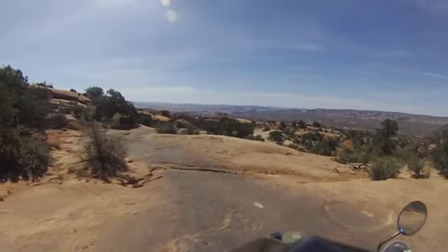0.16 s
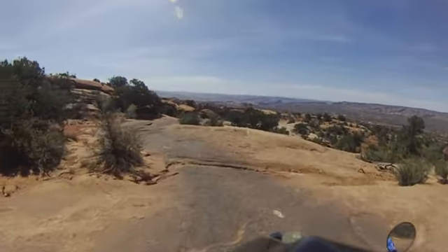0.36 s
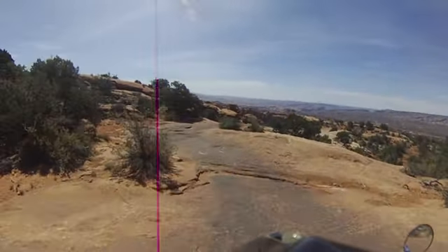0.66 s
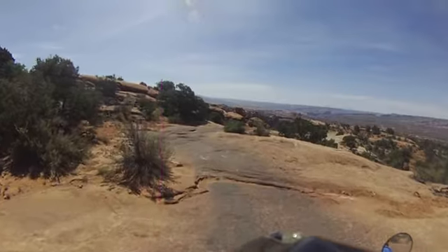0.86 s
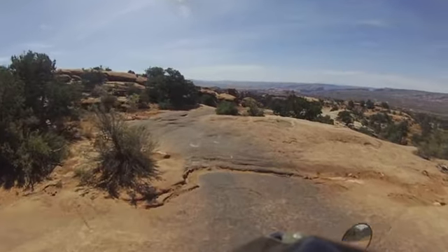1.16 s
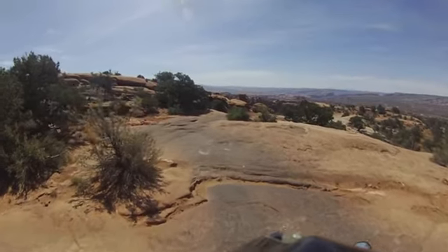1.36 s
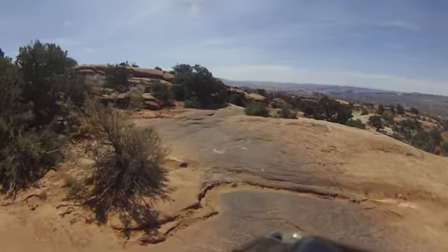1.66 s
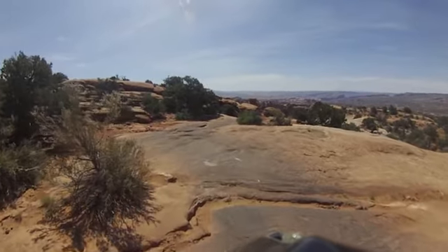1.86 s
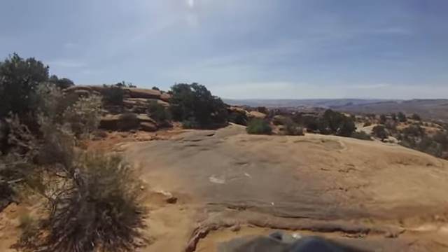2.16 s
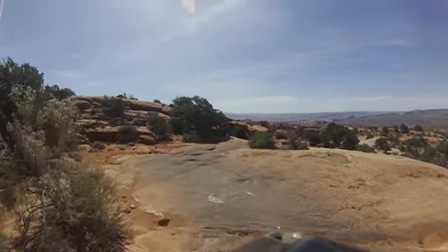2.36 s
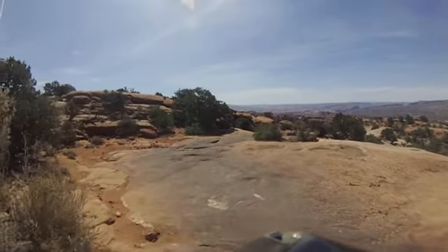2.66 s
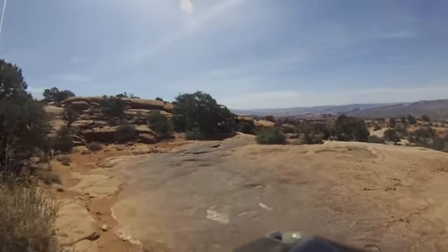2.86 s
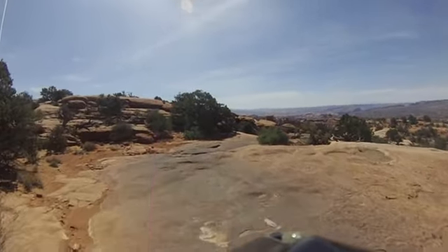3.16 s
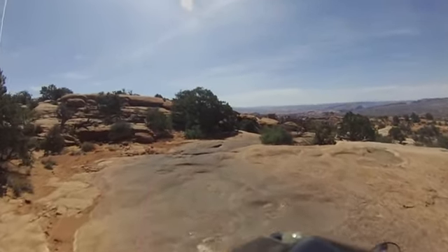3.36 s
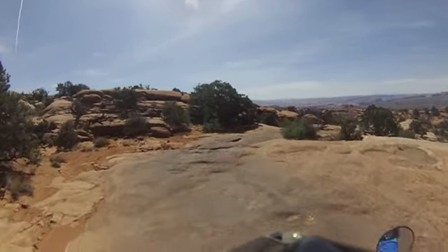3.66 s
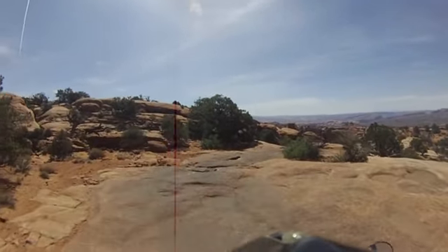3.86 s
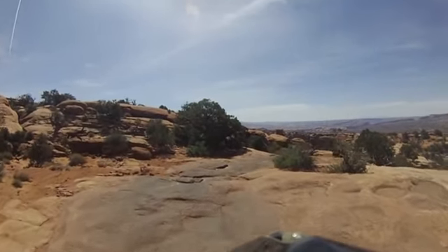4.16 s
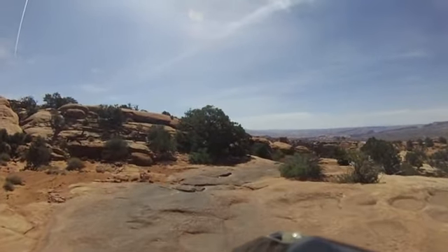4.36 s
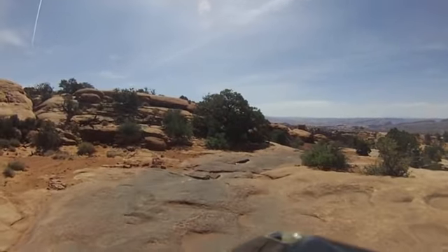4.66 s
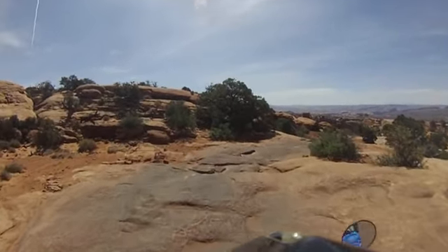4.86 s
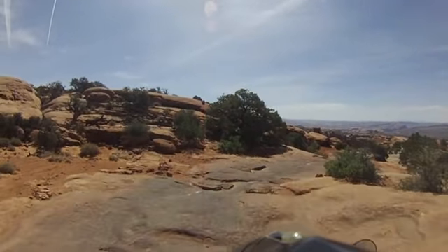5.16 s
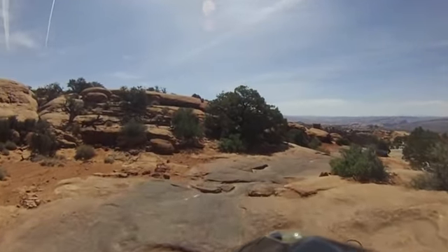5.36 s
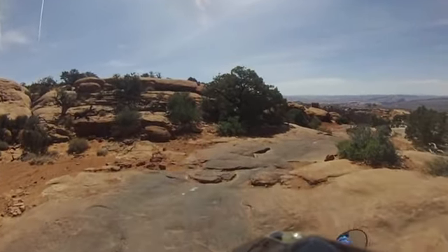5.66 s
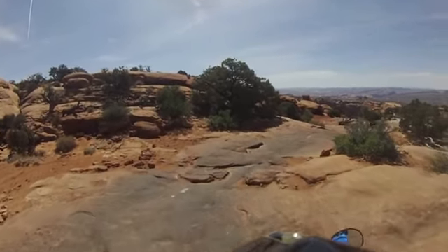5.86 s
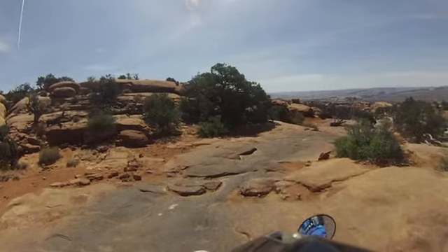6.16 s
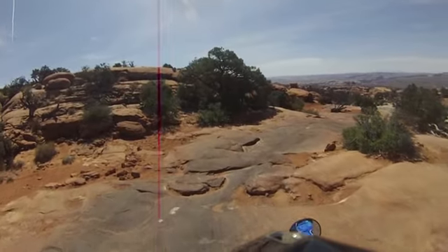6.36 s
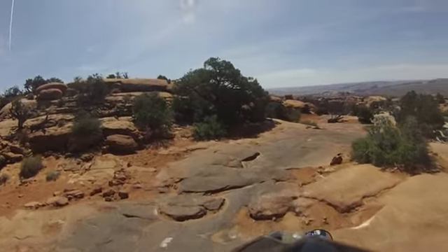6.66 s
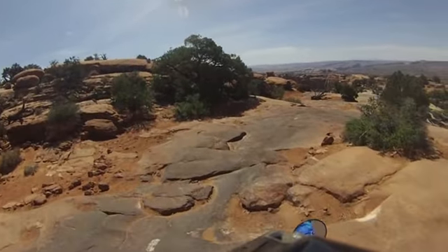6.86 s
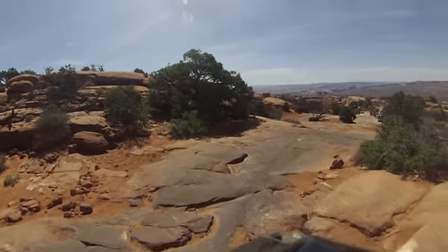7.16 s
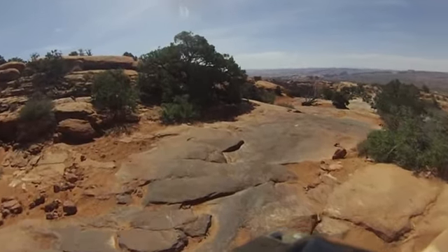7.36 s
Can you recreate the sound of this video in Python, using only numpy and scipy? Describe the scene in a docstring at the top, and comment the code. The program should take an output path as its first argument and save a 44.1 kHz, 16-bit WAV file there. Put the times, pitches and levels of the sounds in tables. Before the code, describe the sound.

Heard from the seat, a quad bike putters slowly over rock, its throttle rising and dropping while tyres scrub and loose parts knock.

```python
"""A quad bike on desert rock

A single-cylinder quad bike crawls over bare rock, heard from the rider's place.
Each firing is a separate chug in the muffler, hard on the throttle and soft when it coasts.
The timing chain sizzles, the tyres rumble and scrub, and loose parts knock on the bumps."""
import sys
import numpy as np
from scipy import signal
from scipy.fft import rfft, irfft, next_fast_len
from scipy.io import wavfile

SR = 44100
rng = np.random.default_rng(int(sys.argv[2]) if len(sys.argv) > 2 else 0)


def master(y):
    """Save y as 16-bit WAV."""
    cut = np.clip(np.atleast_2d(y).T, -1, 1)
    pcm = np.round(cut * 32767)  # scale
    wavfile.write(sys.argv[1], SR, pcm.astype(np.int16))


N = 331191
TIME = np.arange(N) / SR


def amp(db):
    """Turns decibels into a number to multiply a sound by."""
    return 10 ** (np.asarray(db) / 20)


def unit(x):
    """Scales a signal so that its average (rms) level is 1."""
    return x / np.sqrt(np.mean(x ** 2) + 1e-20)


def curve(rows):
    """Joins rows of time and value with straight lines, giving one value per sample."""
    return np.interp(TIME, *np.transpose(rows))


def add(mix, start, sound):
    """Lays a sound into the mix at a start time in seconds."""
    part = mix[max(round(start * SR), 0):][:len(sound)]
    part += sound[:len(part)]


def noise(tone):
    """Noise of level 1, shaped by rows of frequency in Hz and relative level in dB."""
    size = next_fast_len(N)
    hz, db = np.transpose(tone)
    colour = amp(np.interp(np.log(np.fft.rfftfreq(size, 1 / SR) + 1), np.log(hz), db))
    return unit(irfft(rfft(rng.standard_normal(size)) * colour, size)[:N])


def resonate(x, hz, width_hz):
    """Keeps a band of the sound around hz, which may be steady or gliding."""
    turn = np.exp(2j * np.pi * np.cumsum(hz * np.ones(len(x))) / SR)
    decay = np.exp(-np.pi * width_hz / SR)
    return 2 * (turn * signal.lfilter([1 - decay], [1, -decay], x / turn)).real


def wander(rate_hz):
    """A slow random wobble of level 1."""
    knots = np.arange(0, N / SR + 1, 1 / rate_hz)
    return unit(np.interp(TIME, knots, rng.standard_normal(len(knots))))


def cavity(resonances, s):
    """How a hollow space rings at each frequency; s is the frequency in Hz times 1j."""
    return sum(gain * hz * width / (s * s + width * s + hz * hz) for hz, width, gain in resonances)


def tyre_rumble(level_db=-5.5, lumpy_db=0.04):
    """Soft tyres and the frame rumble over the rock."""
    # The rumble's tone. Each row: frequency in Hz, relative level in dB.
    rumble_tone = [(20, -26), (45, -21), (75, -6), (110, -8), (160, 1), (250, -7.5), (330, -9),
                   (440, -10.5), (560, -18.5), (900, -19), (2000, -80)]
    # How the rumble rises and falls. Each row: time in seconds, relative level in dB.
    rolling = [(0.1, -35), (0.55, -37.5), (0.81, -38.5), (3.11, -30.5), (3.76, -36), (4.23, -33.5),
               (4.38, -31.5), (4.66, -36.5), (5.07, -40), (5.54, -39.5), (6.38, -35.5), (6.91, -37.5),
               (7.45, -40.5)]
    return amp(curve(rolling) + level_db + lumpy_db * wander(rate_hz=8.3)) * noise(rumble_tone)


def tyre_scrub(level_db=-3, grip_db=-59.5, hoarse_db=-3.5):
    """Tread blocks stick and slip on the rock: a gliding moan in hoarse noise, swelling at each slip."""
    # Each row is one slip: middle in seconds, length in seconds, pitch in Hz, relative level in dB.
    slips = [(0.19, 0.36, 730, -46), (1.05, 0.29, 910, -47), (1.3, 0.18, 890, -45),
             (1.817, 0.53, 928, -45.5), (2.38, 0.19, 935, -43), (3.21, 0.13, 894, -44),
             (4.01, 0.45, 950, -51), (4.404, 0.21, 870, -45.5), (4.755, 0.18, 747, -44),
             (5.167, 0.35, 734, -42.5), (5.453, 0.37, 798, -41.5), (5.733, 0.23, 894, -48),
             (6.1, 0.43, 840, -49), (6.637, 0.13, 755, -44), (6.97, 0.11, 782, -44), (7.13, 0.12, 940, -53)]
    middles, _, pitches, _ = np.transpose(slips)
    moan_hz = np.interp(TIME, middles, pitches)
    power = amp(grip_db) ** 2  # tyres that hold still scrub faintly
    for middle, length, _, db in slips:
        power += (amp(db) * np.exp(-(2 * (TIME - middle) / length) ** 2)) ** 2
    moan, tread = rng.standard_normal((2, N))
    for _ in range(3):
        moan = resonate(moan, moan_hz, width_hz=135)
        tread = resonate(tread, hz=740, width_hz=420)
    return amp(level_db) * np.sqrt(power) * (unit(moan) + amp(hoarse_db) * unit(tread))


def grit_tick(start_s=3.0155, level_db=-38, fall_s=0.0007):
    """One sharp tick, like grit flicked against the frame."""
    t, out = np.arange(SR // 100) / SR, np.zeros(N)
    add(out, start_s, amp(level_db) * np.exp(-t / fall_s) * rng.standard_normal(len(t)))
    return out


def loose_parts(level_db=-5):
    """Racks and plastic panels rattle briefly on the bumps; small parts ring over a wider band. One short crack
    at 3.935 s belongs to the exhaust's bark rather than to a rattle."""
    # Each row: start in seconds, relative level in dB, pitch in Hz, seconds to fade by 60 dB. The row at 3.935
    # s is a crack in the exhaust's bark; the others are rattles.
    knocks = [(0.653, -42, 1200, 0.044), (0.938, -42, 2600, 0.026), (.957, -48, 2630, 0.066),
              (1.243, -42, 1670, 0.024), (1.37, -41, 1210, 0.067), (2.297, -46, 2400, 0.037),
              (2.557, -27, 447, 0.25), (2.564, -38, 1190, 0.062), (2.578, -42, 1200, 0.075),
              (3.181, -35, 1200, 0.013), (3.935, -34.5, 1420, 0.019), (4.361, -44.5, 2270, 0.072),
              (4.45, -36.5, 1390, 0.018), (6.609, -39, 1300, 0.12), (6.932, -42.5, 1260, 0.23),
              (6.968, -39.5, 1270, 0.012), (7.091, -38, 1280, 0.014)]
    t, out = np.arange(SR // 6) / SR, np.zeros(N)
    for start, db, hz, fade_s in knocks:
        width_hz = 400 + .15 * hz
        rattle = amp(-60 * t / fade_s) * rng.standard_normal(len(t))
        ring = resonate(resonate(rattle, hz, width_hz), hz, width_hz)
        add(out, start, amp(db + level_db) * 2 * ring / abs(ring).max())
    return out


def casing_and_chain(chugs, casing_db=10, chain_db=2.5, casing_throb=0.025, chain_throb=0.12):
    """The engine casing churns and the timing chain sizzles, both swelling once a cycle."""
    # The tone of each part. Each row: frequency in Hz, relative level in dB.
    casing_tone = [(250, 6), (500, 4.5), (700, 5), (950, -8), (1120, -4.5), (1500, -6), (2000, -17.5),
                   (3000, -21.5), (4500, -34), (9000, -49)]
    chain_tone = [(1200, -20), (2200, -2), (3300, 8), (4600, 6.5), (5100, 12), (5400, 8.5), (5650, 10.5),
                  (5900, 9.5), (6100, 6.5), (6500, 4.5), (8000, -0.5), (15000, -3)]
    # How each part rises and falls. Each row: time in seconds, relative level in dB.
    casing_levels = [(0.1, -56.5), (0.57, -57.5), (0.94, -61.5), (1.45, -54), (2.13, -59), (2.53, -54),
                     (2.74, -56.5), (3.31, -54.5), (3.5, -56.5), (3.78, -55.5), (5.52, -62.5),
                     (5.95, -57.5), (7.45, -59)]
    chain_levels = [(0.1, -64.5), (0.86, -69), (1.49, -64.5), (2.88, -65.5), (3.03, -61.5), (3.38, -65),
                    (3.46, -61.5), (3.6, -70.5), (3.66, -65.5), (5.05, -67), (5.65, -65), (5.77, -63),
                    (7.45, -65)]
    cycles = np.interp(TIME, chugs[:, 0], np.arange(len(chugs)))
    swell = np.cos(2 * np.pi * (cycles - 0.2))  # peaks a fifth of a cycle after each chug
    restless_db = 0.8 * wander(rate_hz=15)
    churn = amp(curve(casing_levels) + casing_db + restless_db) * (1 + casing_throb * swell)
    sizzle = amp(curve(chain_levels) + chain_db + restless_db) * (1 + chain_throb * swell)
    return churn * noise(casing_tone) + sizzle * noise(chain_tone)


def valve_rasp(chugs, level_db=-27.5, delay_s=0.0013, rise_s=0.00026, fall_s=0.0044, echo_s=0.00927):
    """Gas tears past the valve at the front of each hard chug and echoes once along the pipe."""
    # The tone of the rushing gas. Each row: frequency in Hz, relative level in dB.
    rasp_tone = [(250, -18), (450, 19), (650, -3), (900, 3), (1120, -2.5), (1400, 1), (1700, -3.5),
                 (2000, -18.5), (2700, -18), (4000, -28.5), (8000, -44)]
    t, bursts = np.arange(SR // 10) / SR, np.zeros(N)
    burst = (1 - np.exp(-t / rise_s)) ** 2 * np.exp(-t / fall_s)
    for start, db in chugs:
        rasp_db = 4.36 * db  # soft chugs have almost no rasp
        add(bursts, start + delay_s, amp(rasp_db) * burst)
        add(bursts, start + delay_s + echo_s, amp(rasp_db - 4) * burst)
    return amp(level_db) * bursts * noise(rasp_tone)


def firings(idle_db=-3.5, misfire_db=-13, misfire_above_hz=17.3, stumble_s=0.14, build_s=0.037):
    """Start in seconds and strength in dB of each engine cycle: hard on the throttle, soft off it."""
    # Engine speed. Each row: time in seconds, cycles per second.
    speeds = [(0.0, 13.49), (0.27, 14.34), (0.51, 23.01), (0.88, 15.61), (1.17, 20.92), (1.29, 16.32),
              (1.49, 21.55), (2.14, 21.76), (2.28, 20.09), (3.47, 24.92), (3.58, 14.07), (3.74, 20.45),
              (3.82, 16.28), (4.5, 19.55), (4.87, 12.61), (4.99, 14.27), (5.65, 16.71), (5.83, 19.34),
              (6.03, 15.94), (6.46, 17.42), (6.58, 13.26), (7.51, 11.99)]
    # Pulls on the throttle. Each row: opens and shuts in seconds, full strength of the burns in dB.
    pulls = [(0.237, 0.64, -1.5), (0.614, 0.79, -3), (0.897, 1.07, -3), (1.06, 1.24, -1.5),
             (1.989, 2.10, -1.8), (2.879, 3.08, -0.7), (3.347, 3.45, -0.1), (3.569, 4.29, -1.04),
             (4.935, 5.28, -2.5), (5.274, 5.64, -4), (5.656, 6.0, -1), (5.966, 6.17, -1),
             (6.14, 6.47, -1.38)]
    # Pops of unburnt fuel and one misfire at idle. Each row: time in seconds, strength in dB.
    odd_cycles = [(1.38, -2.5), (1.48, -2.5), (1.67, -3.5), (1.94, -3), (2.22, -2), (2.32, -0.5),
                  (2.42, -2.5), (2.70, -4.5), (2.79, -3.5), (3.14, -1), (3.18, -3.5), (3.23, -3.5),
                  (3.51, -1), (5.19, -14)]
    rate_hz = curve(speeds)
    cycle_count = np.floor(np.cumsum(rate_hz) / SR + .5)
    start_samples = np.flatnonzero(np.diff(cycle_count))
    starts = start_samples / SR
    chance = rng.standard_normal(len(starts))
    uneven_db = 0.5 * chance
    # Off the throttle it putts steadily, but runs short of fuel at speed or just after a pull.
    starved = rate_hz[start_samples] > misfire_above_hz
    for _, shuts, _ in pulls:
        starved |= (starts > shuts) & (starts < shuts + stumble_s)
    starved_db = np.minimum(misfire_db + 5.5 * chance, idle_db)
    db = np.where(starved, starved_db, idle_db + uneven_db)
    for opens, shuts, full_db in pulls:
        held = (starts > opens) & (starts < shuts)
        opening = 1 - np.exp(-(starts[held] - opens) / build_s)
        db[held] = idle_db + (full_db - idle_db) * opening + uneven_db[held]
    for when, odd_db in odd_cycles:
        db[np.argmin(abs(starts - when))] = odd_db
    return np.transpose([starts, db])


def engine(chugs, level_db=23, edge_hz=246, draw_hz=69, gulp_db=1.0, base_period_s=0.059):
    """Each cycle sends a puff of swirling gas through the muffler, then gulps air through the airbox."""
    # How the muffler, exhaust pipe and airbox ring. Each row: base pitch in Hz, width in Hz,
    # relative gain at the opening (a minus sign flips the wave).
    muffler = [(56.3, 14, 0.51), (224.4, 57.4, -5), (278.7, 55.6, 5.5), (415, 63, 4), (482.7, 59, -2),
               (1380, 290, 0.65), (2340, 360, 0.29)]
    pipe = [(148.1, 24.3, -4)]
    airbox = [(69, 40, 0.21), (154, 36.4, -0.53), (217.4, 44, 0.4)]
    # How much the pipe booms. Each row: time in seconds, relative level in dB.
    boom_levels = [(0, -1.5), (.35, 2), (.75, 0), (2.1, -0.5), (2.75, 4.5), (3.3, -4), (4.1, -2), (4.3, 4),
                   (4.7, -4), (6.15, -3.5), (6.45, 3.5), (6.65, -1), (7.51, 1)]
    size = 8192
    s = 1j * np.fft.rfftfreq(size, 1 / SR)
    t, out = np.arange(size) / SR, np.zeros(N)
    starts, strengths_db = np.transpose(chugs)
    booms = amp(np.interp(starts, *np.transpose(boom_levels)))
    for start, strength, period, boom in zip(starts, amp(strengths_db), np.gradient(starts), booms):
        speed = base_period_s / period
        # A stronger burn and a faster valve give a sharper puff.
        puff_hz = edge_hz * strength ** 0.93 * speed ** 0.12
        puff = strength / (1 + s / puff_hz) ** 2
        # The falling piston draws gas back, fired or not.
        suction = 0.51 * speed / (1 + s / (draw_hz * speed)) ** 2
        eddies = .007 * rng.standard_normal(size) * np.exp(-t / .012)
        swirl = rfft(eddies) / (1 + s / edge_hz)
        # Faster running heats the gas, so the exhaust rings higher.
        hot_s = s / speed ** 0.093
        exhaust = (puff - suction + swirl) * (cavity(muffler, hot_s) + boom * cavity(pipe, hot_s))
        # The intake opens about a quarter cycle later, and gulps harder with speed.
        delay = np.exp(-2 * np.pi * s * 0.2518 * period)
        uneven = 1 + .2 * rng.standard_normal()
        gulp = amp(gulp_db) * speed ** 1.16 * uneven
        intake = gulp * delay * cavity(airbox, s)
        add(out, start, irfft(exhaust + intake))
    return amp(level_db) * out


def scene():
    """The bike sits right below the listener, so it sounds the same in both ears."""
    chugs = firings()
    quad = engine(chugs) + valve_rasp(chugs) + tyre_rumble() + casing_and_chain(chugs)
    quad += tyre_scrub() + loose_parts() + grit_tick()
    return np.array([quad, quad])


def record(dry, floor_db=-64.2, hiss_db=-68, flicker_db=3.0, whistle_db=-83):
    """Trims the deepest bass, adds faint noise, flickering hiss and a thin whistle, then trims the top."""
    # The tones of each ear's own faint noise and of the hiss that both share.
    # Each row: frequency in Hz, relative level in dB.
    floor_tone = [(18, -44), (30, -8), (107, -13), (247, -13.5), (364, -15), (426, -20), (612, -21),
                  (881, -31), (978, -31), (1090, -30), (2700, -16), (10700, -15), (15000, -14.5)]
    hiss_tone = [(300, -50), (1500, 19.5), (4000, 2.5), (8000, 1.5), (15000, -10.5)]
    floor = amp(floor_db) * np.array([noise(floor_tone), noise(floor_tone)])
    hiss = amp(hiss_db + flicker_db * wander(rate_hz=10)) * noise(hiss_tone)
    whistle = amp(whistle_db) * unit(resonate(rng.standard_normal(N), hz=11990, width_hz=60))
    bass_cut = signal.butter(2, 24, "high", fs=SR, output="sos")  # below 24 Hz
    treble_cut = signal.firwin(511, 15300, window=("kaiser", 9), fs=SR)  # above 15300 Hz
    heard = signal.sosfiltfilt(bass_cut, dry) + floor + hiss + whistle
    return signal.oaconvolve(heard, treble_cut[None], "same")


dry = scene()
out = record(dry)
master(out)
```